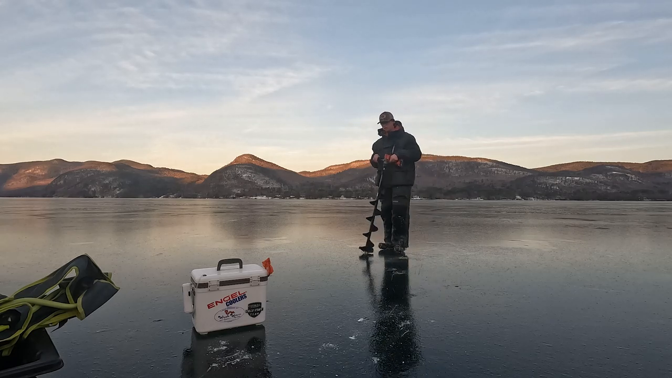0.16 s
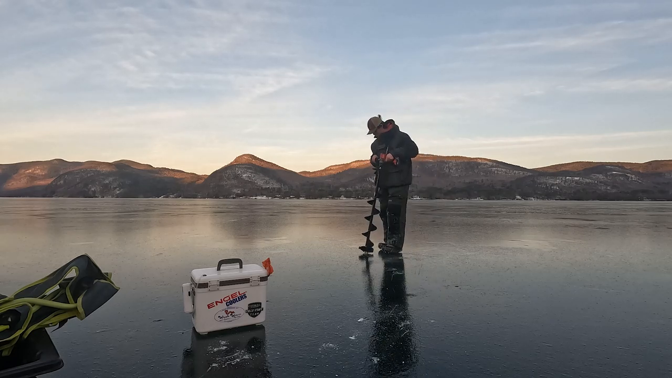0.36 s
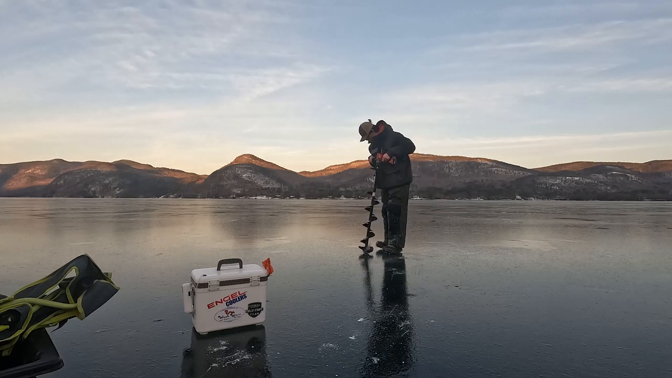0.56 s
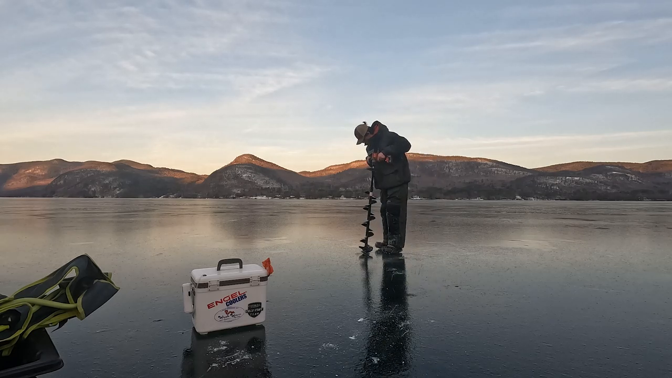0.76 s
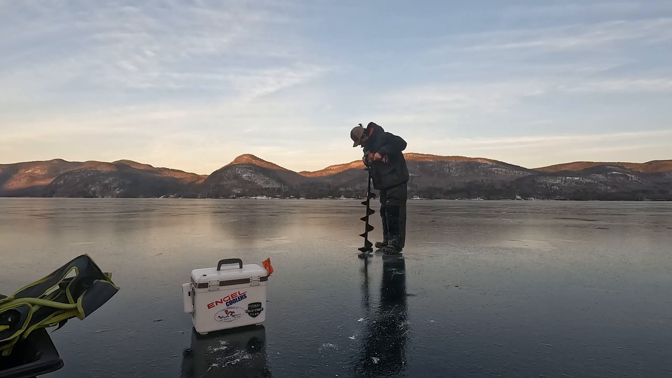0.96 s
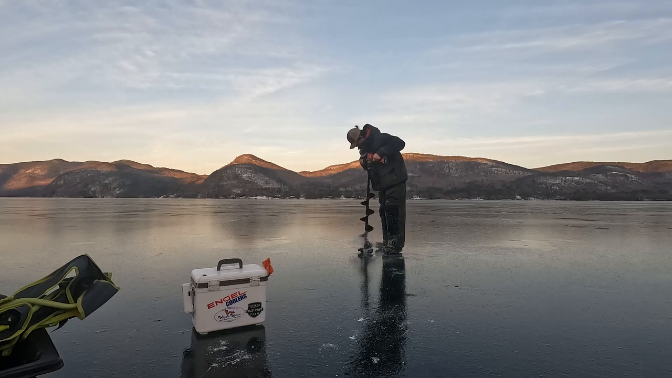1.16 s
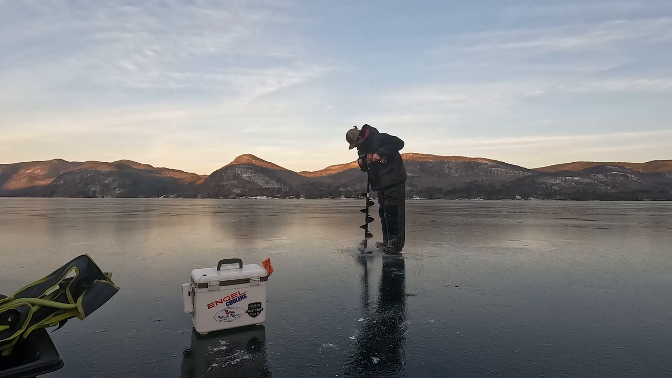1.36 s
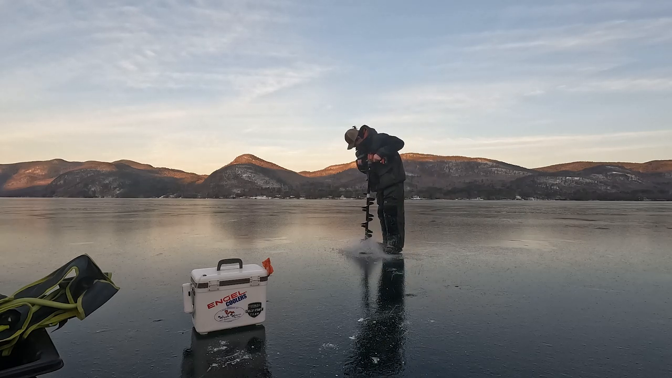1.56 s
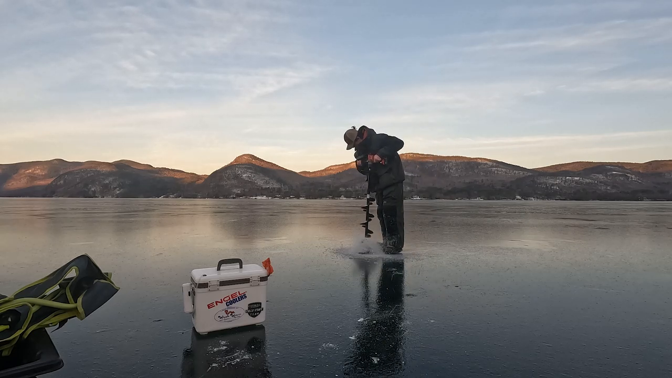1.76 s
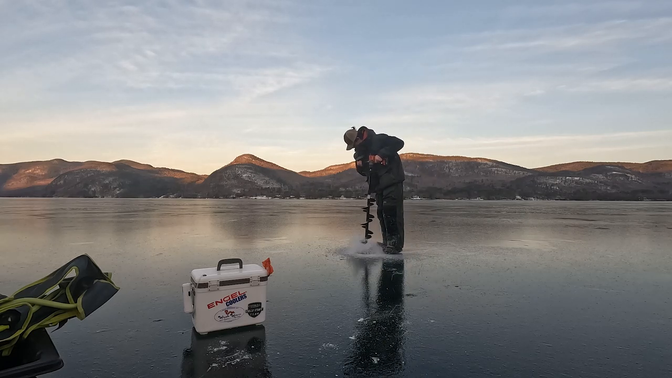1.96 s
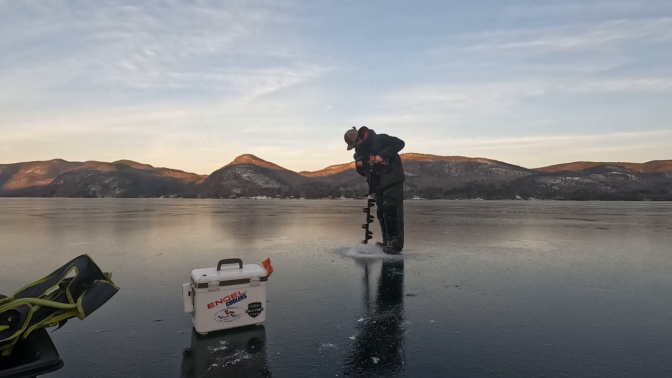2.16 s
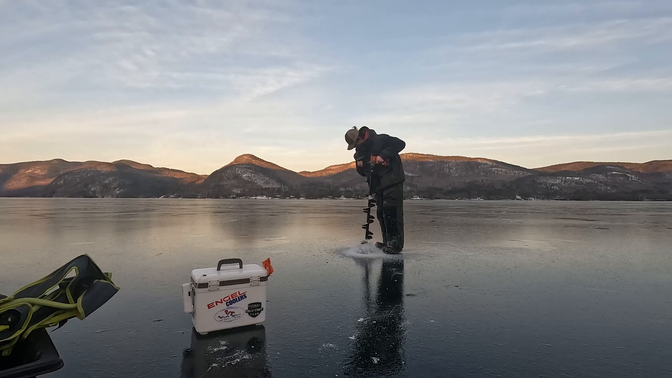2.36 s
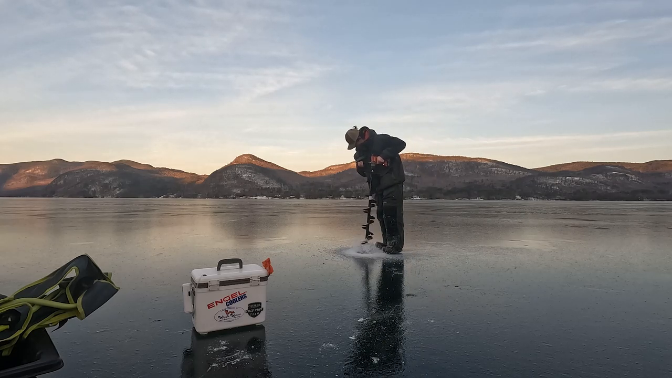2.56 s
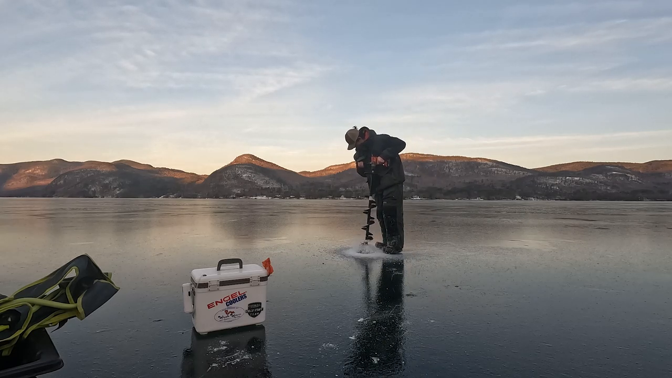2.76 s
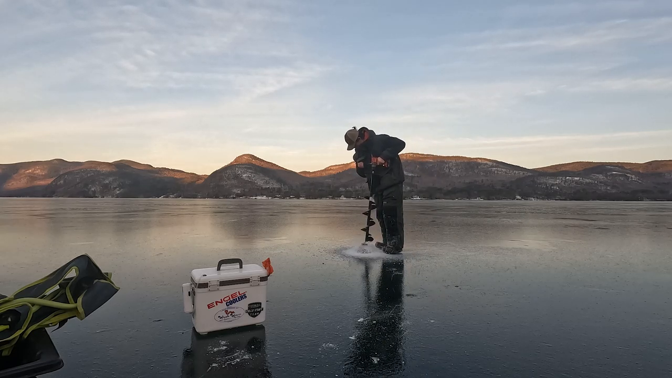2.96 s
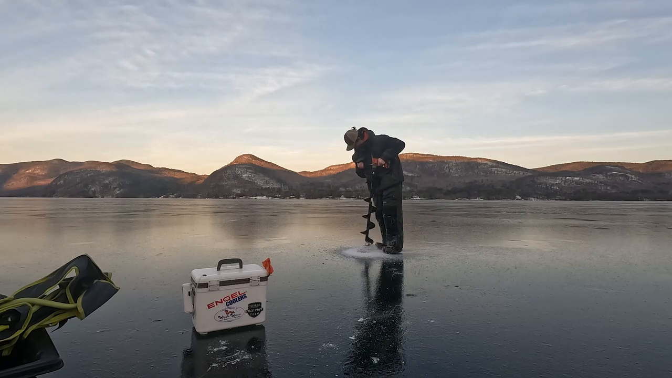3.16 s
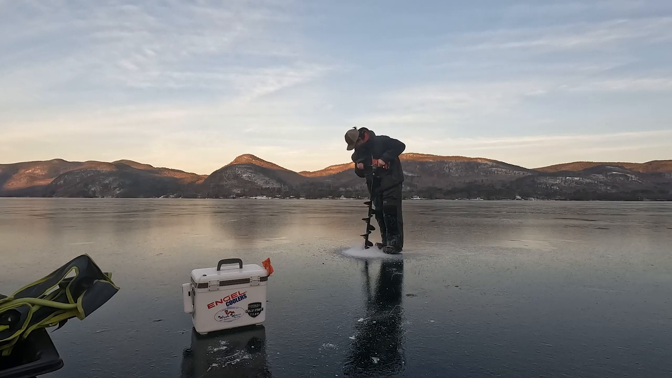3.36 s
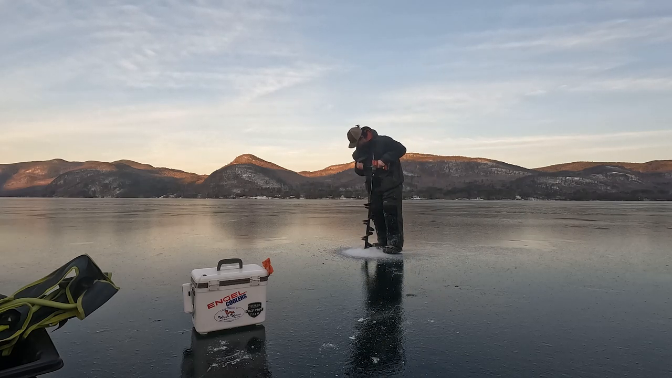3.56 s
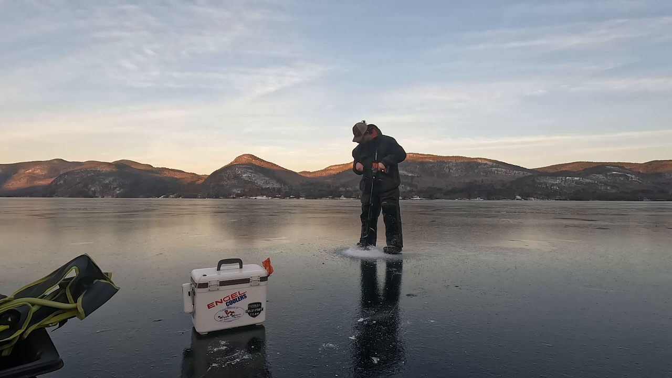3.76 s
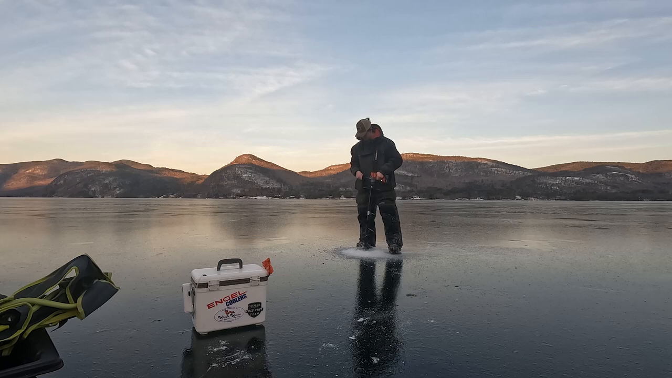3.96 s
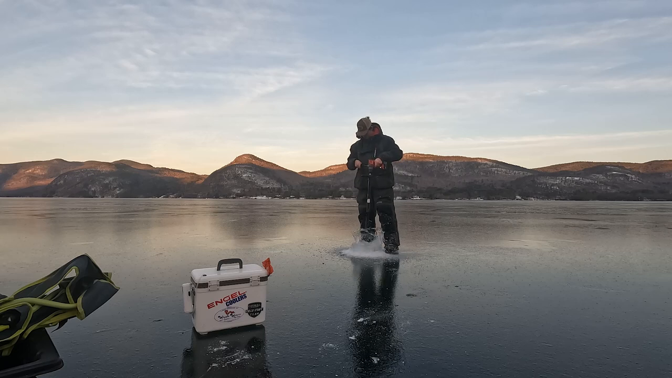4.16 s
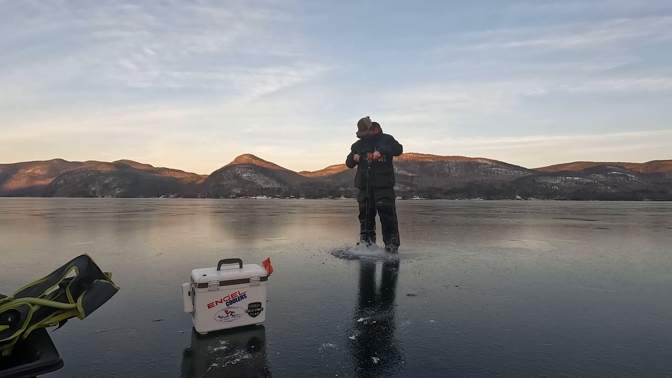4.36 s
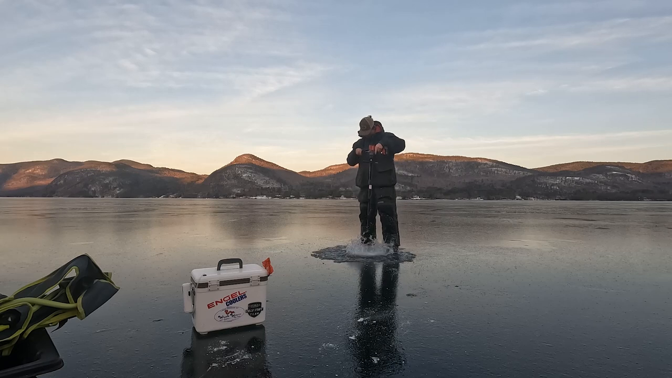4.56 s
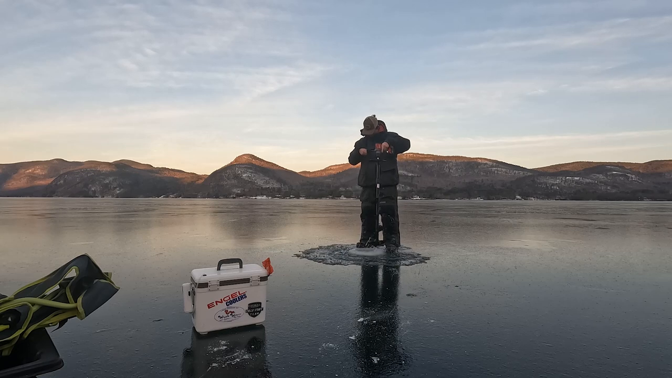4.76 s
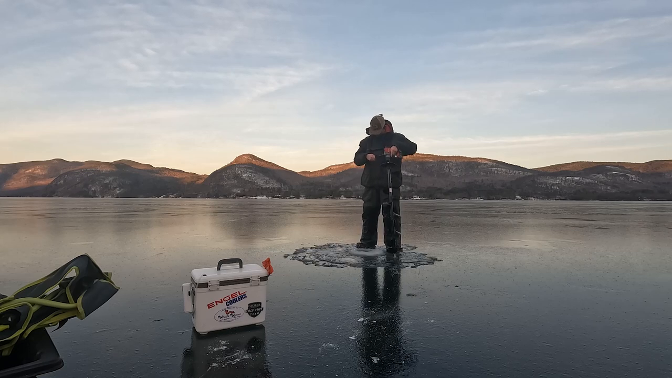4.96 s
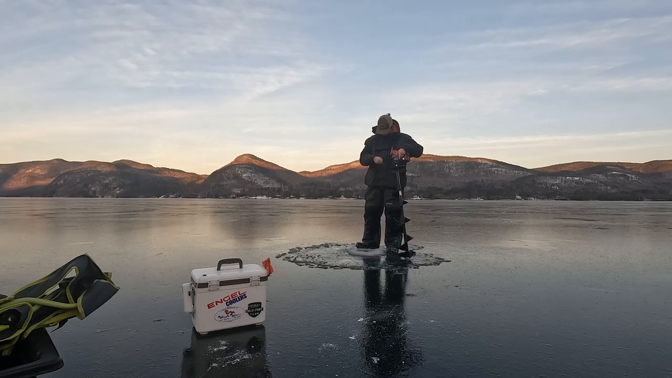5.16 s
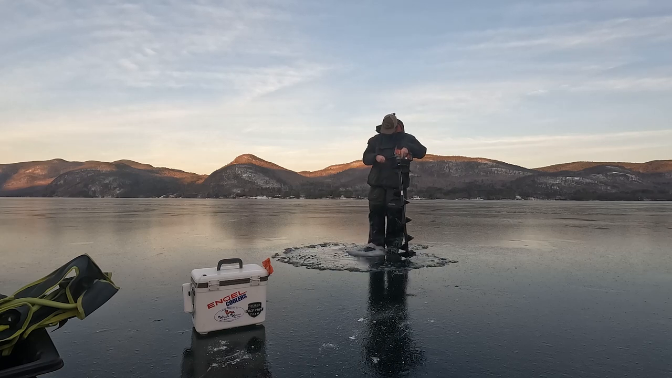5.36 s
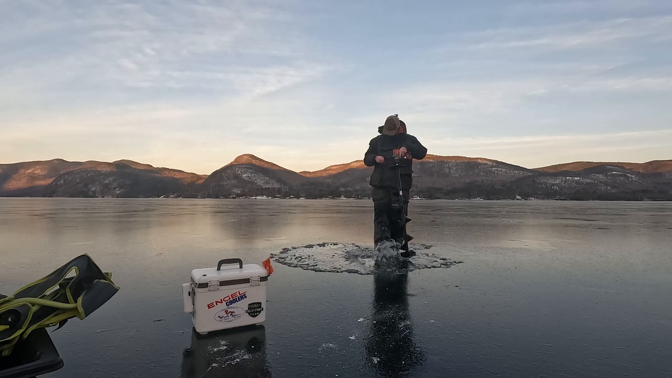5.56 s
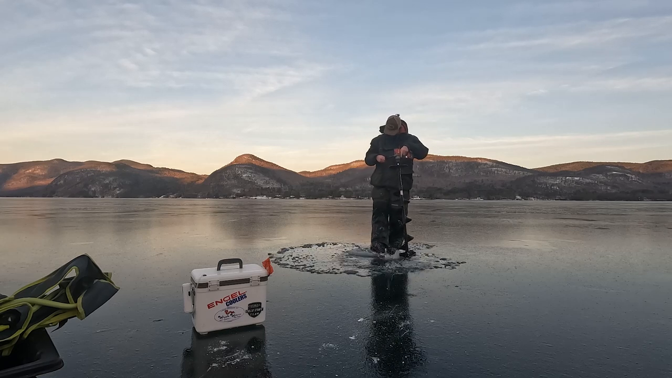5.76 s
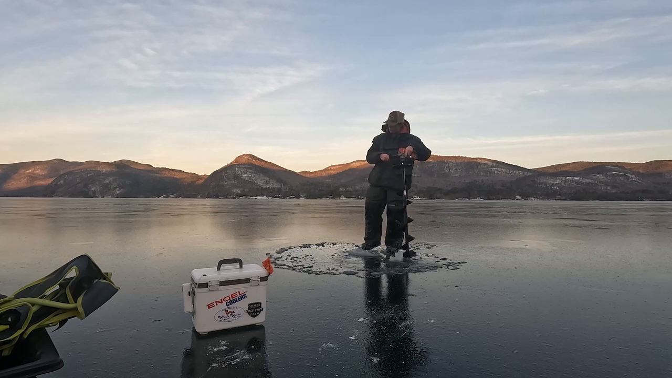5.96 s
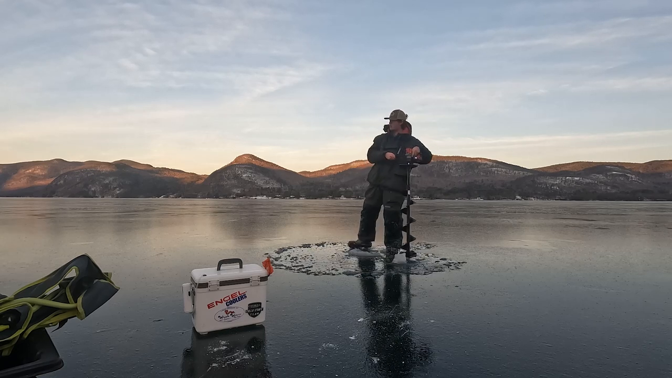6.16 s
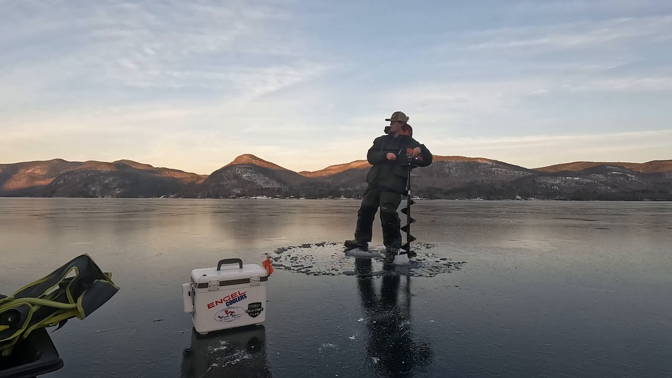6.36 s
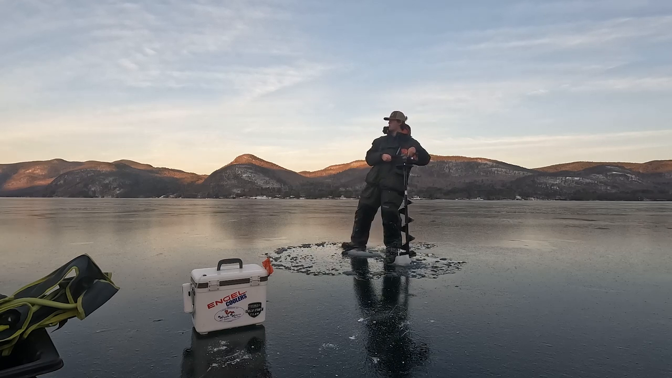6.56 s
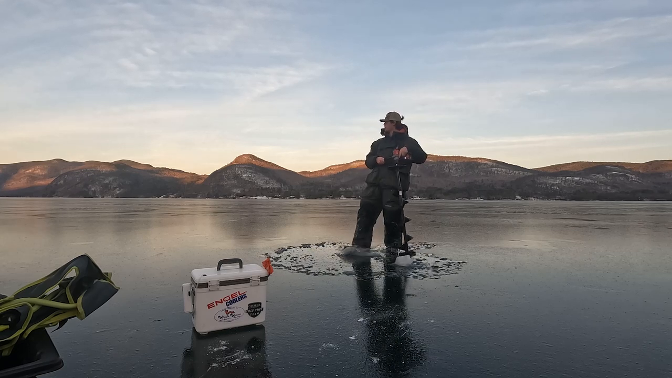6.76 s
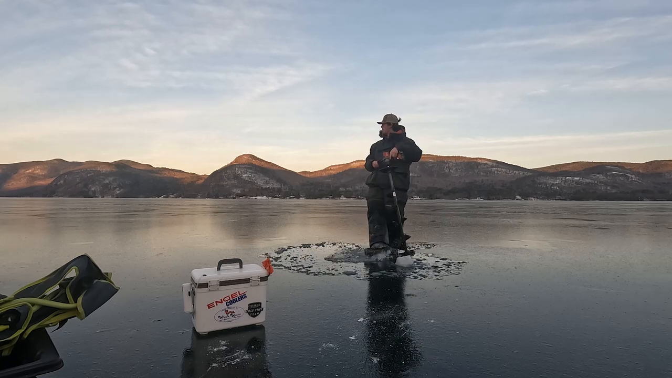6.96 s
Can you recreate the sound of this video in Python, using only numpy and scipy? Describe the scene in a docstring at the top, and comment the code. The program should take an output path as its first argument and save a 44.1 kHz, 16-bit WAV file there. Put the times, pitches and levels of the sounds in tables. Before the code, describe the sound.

A boot scuffs and ice snaps, then an electric auger zips twice and settles into about two seconds of harsh, gritty cutting with a sagging whine and rattling steel. It breaks through into low watery gurgles, clatter and brief trigger whirs. Quiet soft crunches, thuds and small wet squelches of boots in slush follow. Open frozen lake, still air, faint low rumble; dry, nearly mono microphone sound.

```python
"""Shaved ice and motor whine: a battery drill drives an auger through lake ice, two short bites, one long
cut, then it breaks through; boots shift in the slush. Grains of noise make the blades, slush and rattle,
speed-driven sines the whine and gears, resonated knocks the steel shaft, pitched rings the water in the hole.
Cracks, faint ticks, still air and a low rumble complete it, in nearly mono stereo."""
import sys
import numpy as np
from scipy import signal
from scipy.fft import rfft, irfft, next_fast_len
from scipy.io import wavfile
from scipy.ndimage import uniform_filter1d

SR = 44100
rng = np.random.default_rng(int(sys.argv[2]) if len(sys.argv) > 2 else 0)


def unload_audio(sound):
    """Save the sound as a 16-bit wav file, at the path given as the first command line argument."""
    columns = np.transpose(np.atleast_2d(sound))
    # keep every value between -1 and 1, then stretch to whole-number steps
    steps = np.round(np.clip(columns, -1, 1) * 32767)
    wavfile.write(sys.argv[1], SR, steps.astype(np.int16))


N = 309537

# short bites into the sheet: start of hold t/s, hold/s, fall/s, blades level/dB, treble relative level/dB
BITES = [(0.582, 0.11, 0.056, -34, -9.5), (1.038, 0.21, 0.026, -34.5, -1.5)]
BITE_RISE_S = 0.02
# long cut and breakthrough: t/s, blades level/dB, treble relative level/dB, shaft level/dB,
# share that rings/0-1, thumps level/dB
CUT = [(1.35, -80, -5, -75, .5, -70), (1.37, -47.5, -6, -56, .5, -57), (1.389, -30, -7, -51, 0.4, -50),
       (1.6, -34.5, 1, -37, 0.33, -47.5), (1.78, -33, -1, -38.5, 0.69, -48.5),
       (2.1, -33, -3, -41, 0.62, -50), (2.8, -32, -7, -39.5, 0.7, -50), (3.05, -32, -7.5, -37, 0.43, -48.5),
       (3.3, -29, -14, -34, 0.52, -43), (3.449, -30.5, -13.5, -34.5, 0.06, -45.5),
       (3.632, -29.5, -22, -30, 0, -42.5), (3.649, -36.5, -9.5, -35.5, .4, -42.5),
       (3.85, -38, -8, -34, 0.2, -48), (4.0, -45, 1.5, -37.5, 0.28, -44),
       (4.17, -45.5, -1, -43.5, .3, -38.5), (4.2, -50, -3, -57, .4, -45)]
# auger jolts against the ice: start of hold t/s, rise/s, hold/s, fall/s, scrape level/dB,
# treble relative level/dB, shaft level/dB, share that rings/0-1
JOLTS = [(1.254, .05, .03, 0.056, -56, 0, -41.5, 0.76), (4.211, .03, 0.064, 0.14, -38.5, -11, -32, 1),
         (4.33, .05, .06, 0.083, -49, 0.5, -40.5, 0.25), (4.45, 0.3, .11, 0.073, -40.5, -5, -37, 0.3),
         (4.654, 0.33, 0.11, 0.27, -45.5, -11, -37, 0.7), (4.822, .15, 0.17, .02, -69, -13, -39.5, 0.99),
         (5.09, .15, 0.061, 0.1, -72, -18, -48.5, 1)]
# short trigger pulls: whine start t/s, length/s, spin-up/s, nominal top whine f/Hz, sag at the end/share of top,
# whine level before boom/dB, whine fade/(dB/s), gear level at start/dB, housing buzz level/dB
PULLS = [(0.604, 0.049, 0.00687, 3078, .1, -34, 20, -39, -31),
         (1.049, 0.16, 0.014, 3084, .09, -35, -5, -41, -27.5),
         (3.899, 0.21, 0.033, 3274, .1, -33.5, 46, -42.5, -46),
         (4.434, 0.046, 0.012, 3010, 0.012, -32.5, 60, -39.5, -31.5)]
# boots shift in the slush: start of hold t/s, rise/s, hold/s, fall/s, slush level/dB,
# treble relative level/dB, dull crunch level/dB, thud level/dB
STEPS = [(0.101, 0.38, 0.075, .1, -59.5, 11, -47, -42), (0.213, 0.035, 0.021, 0.096, -39, -3, -36.5, -39),
         (4.787, 0.12, 0.04, 0.15, -41, -29, -55, -60.5), (4.961, 0.042, .01, 0.029, -46.5, -6, -60, -60),
         (5.022, 0.32, 0.068, 0.56, -58, -15, -50.5, -58.5),
         (5.263, 0.044, .015, 0.041, -51, -12, -49.5, -56),
         (5.343, 0.1, 0.022, 0.13, -51, -25, -43.5, -52.5), (5.425, .2, 0.07, .1, -44.5, -10.5, -45.5, -52),
         (5.512, .1, 0.034, 0.24, -43, -8, -44.5, -45.5), (5.608, 0.086, 0.25, .1, -50, 0, -59.5, -60),
         (5.828, .03, 0.016, 0.23, -45, -3.5, -64, -61), (6.24, 0.19, 0.067, 0.19, -45, -22, -53, -49.5),
         (6.396, .1, 0.023, .03, -57, -22, -59, -45), (6.55, 0.068, 0.12, .1, -51.5, -11.5, -49.5, -44.5),
         (6.693, 0.18, 0.043, .15, -46, -9, -43, -44.5), (6.808, 0.31, 0.16, 0.34, -43.5, -9, -45, -49)]
HOUSING_HZ, HOUSING_WIDE_HZ = 2910, 218


def amp(db):
    """dB to gain."""
    return 10 ** (np.asarray(db) / 20)


def rms_one(x):
    """Scaled to rms 1."""
    return x / np.sqrt(np.mean(x ** 2) + 1e-20)


def filtered(x, order, hz, kind="low"):
    """Butterworth filter."""
    return signal.sosfilt(signal.butter(order, hz, kind, fs=SR, output="sos"), x)


def burst(s, rise, hold, fall, db, *rest):
    """One event as a table in time: rises from, holds and falls to 25 dB under its top."""
    faint_db = db - 25
    top_end = s + hold
    return [(s - rise, faint_db, *rest), (s, db, *rest),
            (top_end, db, *rest), (top_end + fall, faint_db, *rest)]


def in_time(tables):
    """Columns at every sample, lightly smoothed; the loudest table wins, outside all of them -150 dB."""
    t = np.arange(N) / SR
    columns = np.zeros((len(tables[0][0]) - 1, N))
    columns[0] = -150
    for table in tables:
        s, *given = np.transpose(table)
        here = np.array([np.interp(t, s, c) for c in given])
        louder = (t >= s[0]) & (t <= s[-1]) & (here[0] > columns[0])
        columns[:, louder] = here[:, louder]
    return uniform_filter1d(columns, size=100)


def colour(x, spectrum):
    """Causal minimum-phase filter through (f/Hz, level/dB) points, by folding the cepstrum."""
    size = next_fast_len(N + SR, real=True) // 2 * 2
    hz = np.maximum(np.arange(size // 2 + 1) * SR / size, 1)
    points = np.array(spectrum)
    level_db = np.interp(np.log(hz), np.log(points[:, 0]), points[:, 1])
    cepstrum = irfft(level_db * np.log(10) / 20, size)
    cepstrum[1:size // 2] *= 2
    cepstrum[size // 2 + 1:] = 0
    return irfft(rfft(x, size) * np.exp(rfft(cepstrum)), size)[:N]


def drift(rate_hz):
    """Slow random wander, rms 1: noise through a double pole."""
    r = np.exp(-2 * np.pi * rate_hz / SR)
    wander = signal.lfilter([1], [1, -2 * r, r * r], rng.standard_normal(N + SR))
    return rms_one(wander[SR:])   # settled part


def grains(per_s, spread_db, clump_db, clump_hz):
    """Random clicks of uneven size and either sign, swelling and thinning in level."""
    sizes = amp(spread_db * np.minimum(rng.exponential(1, N), 5)) * rng.choice([-1, 1], N)
    struck = rng.random(N) < per_s / SR
    return sizes * struck * amp(clump_db * drift(clump_hz))


def resonance(x, hz, width_hz):
    """Two-pole resonance, about gain 1 on top."""
    r = np.exp(-np.pi * width_hz / SR)
    poles = [1, -2 * r * np.cos(2 * np.pi * hz / SR), r * r]
    return signal.lfilter([(1 - r * r) / 2, 0, (r * r - 1) / 2], poles, x)


def rubbing(tables, clicks, spectrum):
    """Grains in a fixed colour; the treble comes and goes with the sharpness of the contact."""
    level_db, treble_db = in_time(tables)
    noise = colour(clicks, spectrum)
    low = filtered(noise, 2, 5000)
    high = filtered(noise, 2, 5000, "high")
    return amp(level_db) * (rms_one(low) - amp(treble_db) * rms_one(high))   # minus: in phase at crossover


def bubbles(tables, low_hz, high_hz, per_s, damping, spill):
    """Short rings spread in pitch; those near the moving centre are the loudest."""
    level_db, centre_hz = in_time(tables)
    pitches_hz, dealt = np.geomspace(low_hz, high_hz, num=12), rng.integers(0, 12, N)
    pops = grains(per_s, spread_db=-0.5, clump_db=2.0, clump_hz=9.4)
    power = out = 0
    for k, hz in enumerate(pitches_hz):
        octaves_off = np.log2(hz / (centre_hz + 1))
        share = spill + np.exp(-(octaves_off / .55) ** 2)
        ring = resonance(pops * (dealt == k) + 1e-18, hz, damping * hz)
        out = out + share * rms_one(resonance(ring, hz, 0.83 * hz))
        power = power + share ** 2
    return amp(level_db) * out / np.sqrt(power)


def blades():
    """Steel shaves ice: dense chipping grains follow the bites, the cut and the jolts."""
    # colour of breaking chips: f/Hz, level/dB
    chip_spectrum = [(200, -37), (700, -7.5), (1200, -6), (1700, 0), (2600, 3.5), (4100, -2.5),
                     (6900, -13.5), (9000, -22.5), (11200, -23), (14000, -45)]
    contact = [burst(s, BITE_RISE_S, hold, fall, db, treble_db) for s, hold, fall, db, treble_db in BITES]
    contact += [np.array(CUT)[:, :3]]
    contact += [burst(*row[:6]) for row in JOLTS]
    chips = grains(per_s=9000, spread_db=2.0, clump_db=1.0, clump_hz=38)
    return rubbing(contact, chips, chip_spectrum)


def rotor():
    """Whine f/Hz, whine and gear level/dB, on-gate: pulls spin up and sag; the cut speeds up once a turn."""
    # motor in the long cut: t/s, whine f/Hz, whine level before boom/dB, speed-up once a turn/Hz
    loaded = [(1.601, 3110, -40, -0.5), (1.76, 2785, -37, -1), (1.951, 2600, -34.5, 39),
              (2.2, 2557, -37.5, 250.5), (2.7, 2530, -35.5, 350), (2.9, 2500, -35, 175),
              (3.01, 2476, -38.5, 59), (3.07, 2248, -36.5, 62.5), (3.251, 2172, -38.5, 62.5),
              (3.42, 2080, -39, -2.5)]
    turn_s, freed_at_s, freed_turns = .202, 2.3, .17   # once a turn the blades run free for a moment
    labours_hz, gear_drop_db_per_hz = 2470, .12   # in the cut the gears sing once the whine sinks this low
    boom_db, boom_wide_hz = 8, 204   # the whine swells while it passes the mode of the housing
    gripped = 0.19   # share of the boom (in dB) left while hands bear down on the housing
    start_low, slowing_s = .18, .05   # speed lacking at the start (share of top); time over which it sags
    gear_fade_db_per_s, let_go_db, let_go_s = 23, 16.5, 0.0076   # both tones dip as the trigger is let go
    t = np.arange(N) / SR
    s, *given = np.transpose(loaded)
    hz, whine_db, freed_hz = [np.interp(t, s, c) for c in given]
    turn = ((t - freed_at_s) / turn_s + .5) % 1 - .5
    hz = hz + freed_hz * np.exp(-(turn / freed_turns) ** 2)
    gear_db = whine_db - gear_drop_db_per_hz * np.maximum(hz - labours_hz, 0)
    swell_db = np.full(N, gripped * boom_db)
    on = (t > s[0]) & (t < s[-1])
    for start, length, spin_up, top_hz, sag, pull_db, fade, pull_gear_db, _ in PULLS:
        now = (t > start) & (t < start + length)
        since = t[now] - start
        lacking = start_low * np.exp(-since / spin_up)
        sagging = sag * np.exp((since - length) / slowing_s)
        hz[now] = top_hz * (1 - lacking - sagging)
        dying_db = let_go_db * np.exp((since - length) / let_go_s)
        whine_db[now] = pull_db - fade * since - dying_db
        gear_db[now] = pull_gear_db - gear_fade_db_per_s * since - dying_db
        swell_db[now] = boom_db
        on |= now
    whine_db = whine_db + swell_db * np.exp(-((hz - HOUSING_HZ) / boom_wide_hz) ** 2)
    return hz, whine_db, gear_db, uniform_filter1d(on * 1., size=500)


def motor():
    """Whine and two gear tones follow the speed; levels waver, and pitch wavers more under load."""
    free_hz = 3090   # whine without load
    gear_ratio, stage_ratio, stage_db = 1.63, 1.25, -6.5   # tones over whine; second stage under first
    hz, whine_db, gear_db, sounding = rotor()
    load = np.clip(1 - hz / free_hz, 0, 1)   # the harder the cut, the slower and shakier the rotor
    shake = (.004 + .025 * load) * drift(120) + .045 * load * drift(20)
    phase = 2 * np.pi * np.cumsum(hz * (1 + shake)) / SR
    whine = amp(whine_db + 1.8 * drift(47)) * np.sin(phase)
    stages = np.sin(gear_ratio * phase) + amp(stage_db) * np.sin(stage_ratio * phase)
    gear = amp(gear_db + 1.5 * drift(60)) * stages
    return sounding * np.sqrt(2) * (whine + gear)


def housing():
    """Rattling gears excite one mode of the plastic shell."""
    # gears rattle as the motor runs down: start of hold t/s, rise/s, hold/s, fall/s, level/dB
    rattle_table = [(1.22, .03, 0.027, 0.028, -43), (3.759, 0.073, 0.12, 0.035, -41),
                    (4.49, .03, 0.045, .03, -46), (4.65, 0.071, 0.065, .4, -47.5),
                    (5.097, 0.09, 0.025, .03, -55)]
    lead_s, rise_s, hold_s, fall_s = 0.035, 0.011, 0.014, 0.013   # buzzes before the rotor is up
    buzzes = [burst(row[0] - lead_s, rise_s, hold_s, fall_s, row[-1]) for row in PULLS]
    level_db, = in_time(buzzes + [burst(*row) for row in rattle_table])
    rattle = grains(per_s=2000, spread_db=2.5, clump_db=1.5, clump_hz=80)
    once = resonance(rattle, HOUSING_HZ, HOUSING_WIDE_HZ)
    return amp(level_db) * rms_one(resonance(once, HOUSING_HZ, HOUSING_WIDE_HZ))


def shaft_knocks():
    """Bites, the cut, jolts and steps all clatter: (t/s, level/dB, share that rings)."""
    under_blades_db, rings = -3.5, 0.21   # in the bites
    return ([burst(s, BITE_RISE_S, hold, 2 * fall, db + under_blades_db, rings) for s, hold, fall, db, _ in BITES]
            + [np.array(CUT)[:, [0, 3, 4]]]
            + [burst(*row[:4], *row[6:]) for row in JOLTS]
            + [burst(*row[:4], row[6], 0) for row in STEPS])


def shaft():
    """Dense small knocks: a dull clatter, and the modes of the steel shaft where ice does not damp it."""
    # modes of the steel shaft: f/Hz, width/Hz, level/dB
    modes = [(947, 46, 8), (1059, 44, 8.5), (1280, 140, -0.5)]
    level_db, share = in_time(shaft_knocks())
    knocks = grains(per_s=2500, spread_db=1.5, clump_db=3.0, clump_hz=41)
    rung = 0
    for k, (hz, width_hz, db) in enumerate(modes):
        rung = rung + (-1) ** k * amp(db) * resonance(knocks, hz, width_hz)
    clatter = filtered(knocks[::-1], 2, [700, 1650], "band")   # reversed: unlike the ringing knocks
    share = np.clip(share, 0, 1)
    return amp(level_db) * (np.sqrt(share) * rms_one(rung) + np.sqrt(1 - share) * rms_one(clatter))


def cracks():
    """Each is a crunch of a few ms: a broad snap and a brief ring."""
    # single cracks and ticks: t/s, nominal level/dB, ring f/Hz, snap level relative to ring/dB
    crack_table = [(0.212, -14.5, 6240, -10), (0.5816, -14.5, 2910, -2), (0.64, -14.5, 3320, -5),
                   (0.685, -20, 2460, -2), (0.7094, -20.5, 1570, -1.5), (0.736, -26.5, 1540, -0.5),
                   (0.967, -44, 6000, -3), (1.029, -28, 2940, 6.5), (1.2044, -11.5, 3490, -21),
                   (3.6344, -16.5, 1220, -15), (4.007, -23, 3100, 3), (4.0881, -18.5, 3740, -6),
                   (4.203, -19.5, 975, 1.5), (4.23, -25, 1060, -9), (4.269, -17.5, 1050, 1),
                   (4.5486, -14, 3140, -3), (4.562, -19, 1150, 5), (4.8914, -36, 950, -1),
                   (4.939, -30.5, 980, 0.5), (5.147, -18.5, 1770, -9.5), (5.261, -28, 6300, -3),
                   (5.27, -31.5, 3130, 3), (5.3198, -37, 1060, -12), (5.342, -26.5, 1060, -17),
                   (5.538, -25, 2900, -13), (5.667, -32, 5600, -2), (5.688, -26.5, 5650, -8),
                   (5.724, -28.5, 1890, -5), (5.7518, -29, 2570, -11), (5.773, -29, 3810, -5),
                   (5.841, -30, 3000, -13), (5.8505, -26, 2870, -13), (6.157, -33.5, 926, -8),
                   (6.208, -29, 2280, -11), (6.372, -33.5, 1790, -11), (6.523, -43, 1070, -7),
                   (6.818, -20.5, 1110, -6), (6.934, -26, 1370, -16)]
    rise_s, decay_s = 0.00041, 0.0043
    out, t = np.zeros(N), np.arange(SR // 10) / SR
    fade = np.exp(-t / decay_s) * np.minimum(t / rise_s, 1)
    bursts = rng.standard_normal((len(crack_table), len(t)))
    snaps = filtered(bursts[:, ::-1], 2, [350, 4800], "band")
    for (s, db, hz, snap_db), noise, snap in zip(crack_table, bursts, snaps):
        ring = rms_one(resonance(noise, hz, 0.12 * hz))
        crunch = (amp(snap_db) * rms_one(snap) + ring) / 2 * fade
        at = round(s * SR)
        out[at:at + len(t)] += amp(db) * crunch[:N - at]
    return filtered(out, 1, 6000)   # distance dulls them


def low_motion():
    """Thumps in the sheet and water in the hole: (t/s, level/dB, centre f/Hz)."""
    # water wells up the hole, or the sheet booms:
    # start of hold t/s, rise/s, hold/s, fall/s, level/dB, centre f/Hz
    gurgle_table = [(0.628, 0.052, 0.02, 0.096, -41.5, 190), (3.738, 0.06, 0.047, 0.073, -33.5, 540),
                    (3.854, 0.088, 0.034, 0.054, -29.5, 322), (4.132, .1, 0.035, 0.064, -36, 334),
                    (4.165, .05, .03, 0.036, -36.5, 594), (4.225, 0.096, 0.054, 0.076, -31.5, 320),
                    (4.337, 0.081, 0.0546, 0.056, -33.5, 350), (4.396, 0.058, 0.013, 0.11, -30.5, 574),
                    (4.544, .05, 0.018, 0.14, -40.5, 605), (4.67, 0.096, 0.034, 0.11, -43.5, 570),
                    (4.963, .05, .01, 0.049, -48.5, 630), (5.314, .05, 0.022, .05, -53, 170),
                    (6.535, .03, .1, .1, -47.5, 170)]
    thump_hz, under_blades_db = 476, -11
    lapping_db, lapping_hz = -58.5, 350   # water that laps under the sheet throughout
    return ([burst(s, BITE_RISE_S, hold, 2 * fall, db + under_blades_db, thump_hz) for s, hold, fall, db, _ in BITES]
            + [[(row[0], row[5], thump_hz) for row in CUT]]
            + [burst(*row) for row in gurgle_table]
            + [burst(*row[:4], row[7], thump_hz) for row in STEPS]
            + [[(0, lapping_db, lapping_hz), (N / SR, lapping_db, lapping_hz)]])


def gurgle():
    """Low damped rings: water in the hole and thumps in the sheet."""
    return bubbles(low_motion(), 169.8, 778, per_s=500, damping=0.14, spill=0.3)


def droplets():
    """Drops and crystals of slush: sparse short rings spread over the treble."""
    drops = grains(per_s=600, spread_db=2.8, clump_db=2.0, clump_hz=15)
    dealt = rng.integers(0, 10, N)
    out = 0
    for k, hz in enumerate(np.geomspace(1400, 8000, num=10)):
        ring = resonance(drops * (dealt == k) + 1e-18, hz, 0.086 * hz)
        out = out + rms_one(ring) * np.sqrt(hz / 3000)
    return out


def slush():
    """Boots press wet slush: crunching grains and droplets share one colour and follow the steps."""
    # colour of wet slush: f/Hz, level/dB
    wet_spectrum = [(200, -10), (900, -7), (1600, 7.5), (2900, 9.5), (4500, 3), (6700, -5), (9000, -13.5),
                    (11500, -13.5), (14000, -43)]
    crunch = grains(per_s=5000, spread_db=1.0, clump_db=1.0, clump_hz=59)
    clicks = rms_one(crunch) + amp(-6.5) * rms_one(droplets())
    return rubbing([burst(*row[:6]) for row in STEPS], clicks, wet_spectrum)


def squelch():
    """A boot squelches in the slush: lightly damped rings near a fixed centre for each event."""
    # start of hold t/s, rise/s, hold/s, fall/s, level/dB, centre f/Hz
    squelch_table = [(6.222, .03, .04, .08, -35, 2200), (6.676, .015, .012, .03, -34, 2300),
                     (6.7, .015, .015, .14, -33.5, 2700)]
    return bubbles([burst(*row) for row in squelch_table], 1570, 3230, per_s=1100, damping=0.035, spill=0.058)


def ticking():
    """The cold sheet ticks faintly: sparse tiny clicks, treble only."""
    ticks = grains(per_s=45, spread_db=2.5, clump_db=3.0, clump_hz=4)
    return amp(-78) * rms_one(filtered(ticks, 2, [3500, 12000], "band"))


def low_rumble():
    """Low rumble: bass noise of changing level."""
    # t/s, level/dB
    rumble_levels = [(0.0, -56), (1.6, -68), (3.2, -66.5), (4.1, -62), (4.7, -72.5), (5.6, -61.5),
                     (6.1, -69), (6.62, -54.5), (6.85, -73), (7.02, -62)]
    # f/Hz, level/dB
    rumble_spectrum = [(20, -13), (45, -5.5), (80, -2.5), (130, -4.5), (220, -3), (1000, -72)]
    return amp(in_time([rumble_levels])[0]) * rms_one(colour(rng.standard_normal(N), rumble_spectrum))


def air():
    """Still air over the lake: steady coloured noise."""
    # f/Hz, level/dB
    air_spectrum = [(76, -46.5), (130, -5), (429, 0.5), (1450, -11.5), (3440, -17), (3940, -18.5),
                    (6880, -28.5), (8840, -34), (11100, -39), (13000, -47)]
    return amp(-54) * rms_one(colour(rng.standard_normal(N), air_spectrum))


def stereo(mid):
    """Nearly mono; a fluctuating difference, strongest near 12 kHz, where the right is louder on average."""
    # f/Hz, side over mid level/dB
    side_spectrum = [(30, -24), (300, -40.5), (2500, -67), (6000, -28), (9000, -21.5), (14000, -11)]
    band = signal.butter(2, [11600, 12800], "band", fs=SR, output="sos")
    in_band = amp(-3.5) * signal.sosfiltfilt(band, mid)
    side = colour(mid, side_spectrum) * drift(340) + in_band * (drift(150) - .4)
    return np.array([mid + side, mid - side])


def scene():
    """All sources, summed and spread to left and right."""
    drill = blades() + motor() + housing() + shaft()
    ice_and_water = cracks() + gurgle() + ticking()
    boots = slush() + squelch()
    return stereo(drill + ice_and_water + boots + low_rumble() + air())


def record(dry):
    """A narrow band is notched out, peaks are rounded, deep bass and the top are cut."""
    dip_hz, deep_hz, wide_hz, cutoff_hz = 8830, 60.5, 2550, 14400
    cos = np.cos(2 * np.pi * dip_hz / SR)
    zero, pole = np.exp(-np.pi * np.array([deep_hz, wide_hz]) / SR)
    dip = [1, -2 * zero * cos, zero ** 2], [1, -2 * pole * cos, pole ** 2]
    heard = signal.lfilter(*dip, dry) * (1 + pole) / 2
    heard = .32 * np.tanh(heard / .32)
    heard = filtered(heard, 2, 45, "high")
    return signal.sosfilt(signal.cheby2(14, 60, cutoff_hz, fs=SR, output="sos"), heard)


dry = scene()
out = record(dry)
unload_audio(out)
```